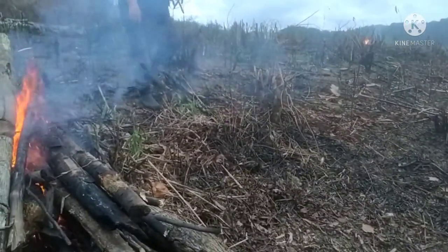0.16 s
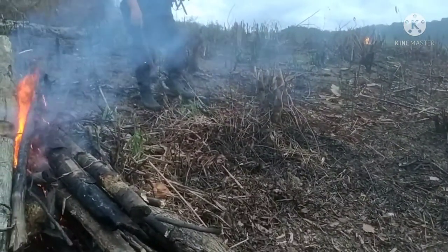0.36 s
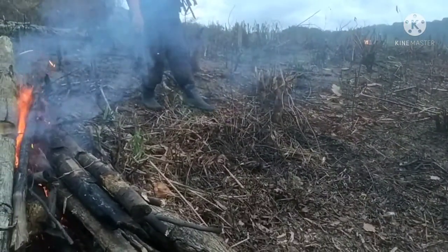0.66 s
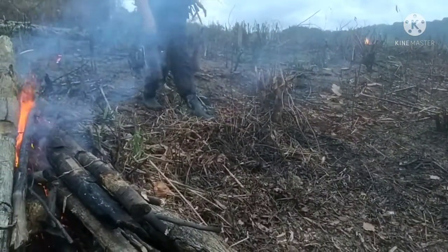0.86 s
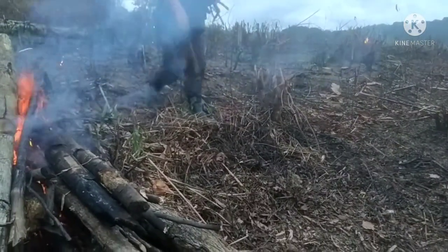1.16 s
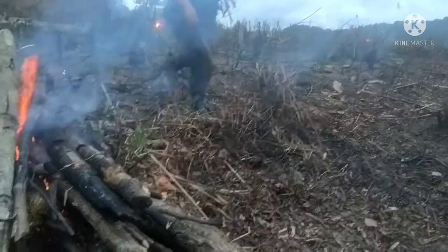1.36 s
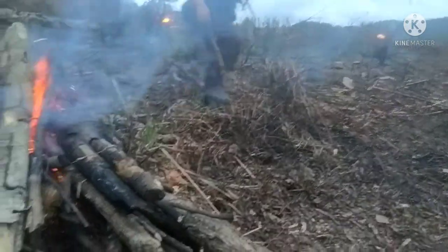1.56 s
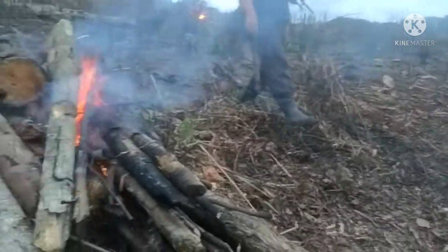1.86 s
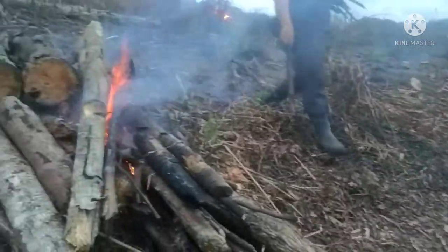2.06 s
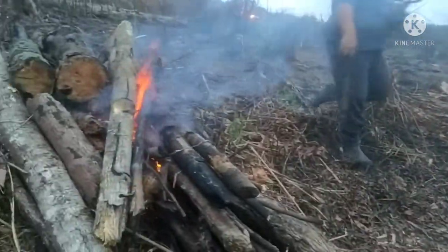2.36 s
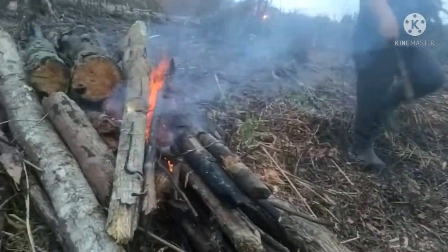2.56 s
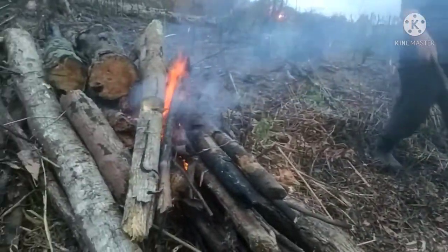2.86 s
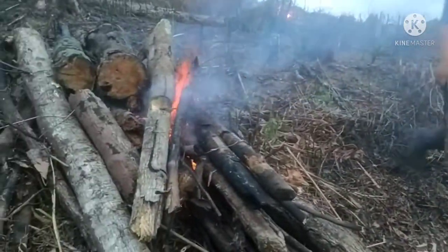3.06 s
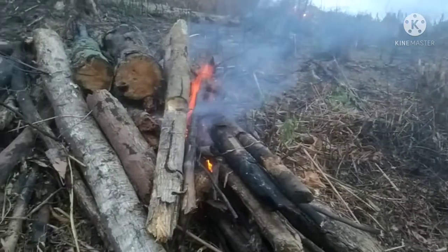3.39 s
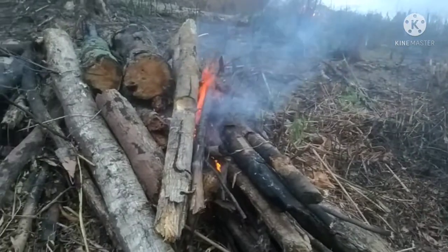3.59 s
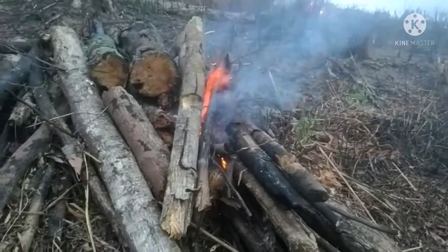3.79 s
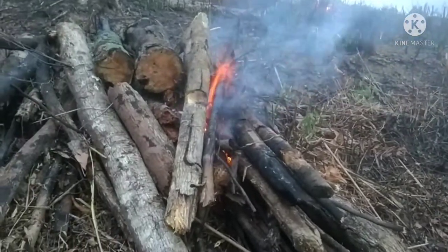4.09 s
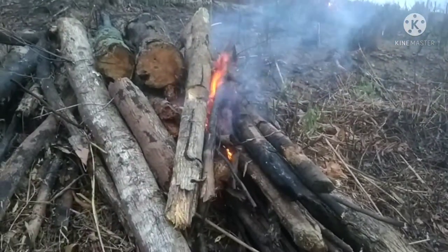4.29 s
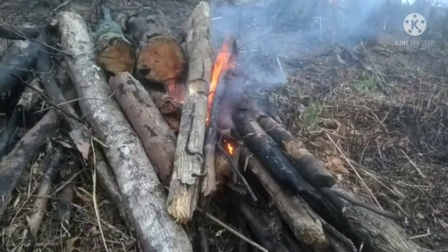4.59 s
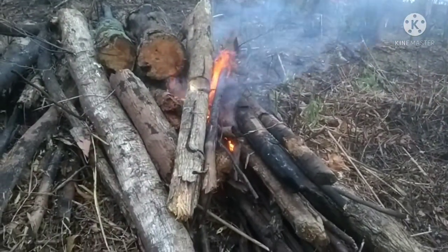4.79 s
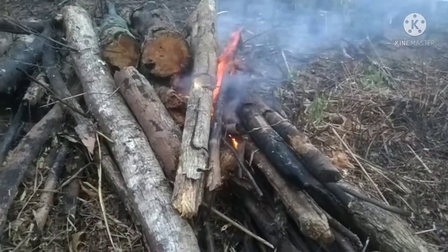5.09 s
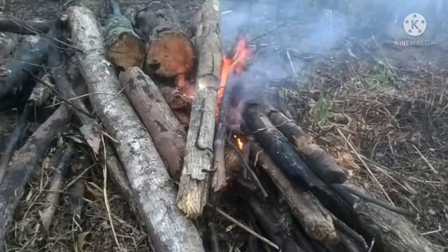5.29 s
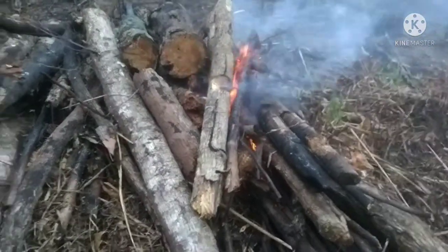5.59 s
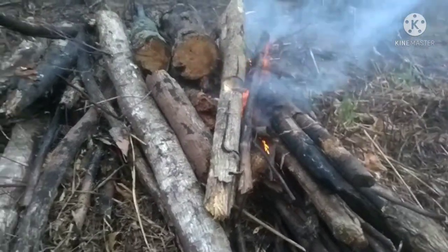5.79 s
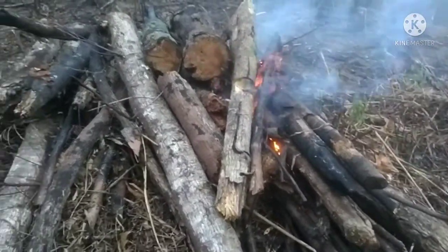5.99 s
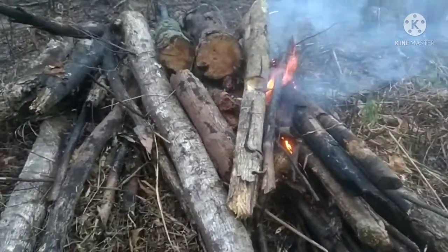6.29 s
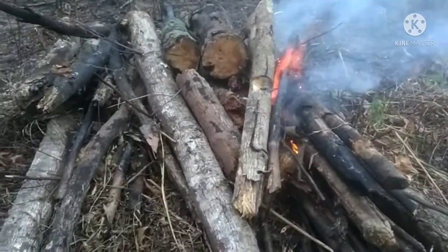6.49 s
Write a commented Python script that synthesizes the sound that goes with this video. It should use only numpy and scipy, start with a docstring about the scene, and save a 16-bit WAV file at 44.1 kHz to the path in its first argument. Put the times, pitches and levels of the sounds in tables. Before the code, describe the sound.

A steady high cicada buzz, with someone walking away over dry stalks and twigs beside a softly popping log fire.

```python
"""Cicadas drone all around a cleared field at evening, each a fast train of tymbal clicks
whose rate sags through a phrase. Close by on the left of the microphone a log fire pops
and lets off short hisses of steam, while someone walks away through dry brush,
crunching stalks and snapping twigs. A faint cricket and thin trills lie far behind."""
import sys
import numpy as np
from scipy import signal
from scipy.fft import rfft, irfft
from scipy.io import wavfile

SR = 44100
rng = np.random.default_rng(int(sys.argv[2]) if len(sys.argv) > 2 else 0)


def dump_mix(stems):
    """Bounce the given channels to the path in sys.argv[1] as a 16-bit WAV at rate SR."""
    frames = np.atleast_2d(stems).T  # one column per channel
    limited = np.clip(frames, -1, 1)  # hard clip at full scale
    pcm = np.round(limited * 32767).astype(np.int16)
    wavfile.write(sys.argv[1], SR, pcm)


N = 293265
T = np.arange(N) / SR
HZ = np.fft.rfftfreq(N, 1 / SR)


def tymbal_phrase(length_s, body_hz, rate_hz, width_hz, skirt_hz, sag, sag_s, jitter,
                  uneven_db=1.78, fade_s=.063):
    """Tymbal clicks ring the hollow abdomen; the muscle starts fast and slows a little."""
    t = T[:int(length_s * SR)]
    rate = rate_hz * (1 + sag * (np.exp(-t / sag_s) - np.exp(-length_s / sag_s)))
    cycles = np.cumsum(rate) / SR
    timing, strength = rng.standard_normal((300, 2))[:int(cycles[-1]) - 1].T
    at = np.interp(np.arange(len(timing)) + .5 + jitter * timing, cycles, np.arange(len(t)))
    size = undb(uneven_db * strength)
    # each click is shared between the two samples around it
    sample, part = at.astype(int), at % 1
    clicks = np.bincount(sample, size * (1 - part), len(t)) + np.bincount(sample + 1, size * part, len(t))
    song = ring(ring(clicks, body_hz, width_hz), body_hz, skirt_hz)
    return unit(song) * np.clip(np.minimum(t, length_s - t) / fade_s, 0, 1)


def near_cicadas(swell_db=1, echo_db=-12):
    """Four singers close by at the field's edge, each phrase swelling to its middle; the trees echo."""
    # Each singer: body resonance in Hz, final click rate in Hz, resonance width in Hz, right lag in seconds.
    voices = {"high": (4260, 74.62, 72, -.00002), "bright": (4106, 74.5, 58, .00009),
              "middle": (3913, 73.8, 70, .00004), "low": (3790, 74.2, 62, 0)}
    # Their phrases. Each row: singer, start and end in seconds, level in dB, left minus right in dB.
    phrases = [("high", -.6, .26, -52, -4), ("high", .25, 1.33, -48.5, -4), ("high", 1.35, 2.05, -51.5, -5),
               ("high", 2.07, 2.88, -48.5, -8), ("high", 2.92, 4.0, -48.5, -8),
               ("high", 4.04, 4.72, -49.5, -4), ("high", 4.76, 5.8, -48.5, -6), ("high", 5.82, 6.9, -51, 2),
               ("bright", -.5, .55, -53.5, 3), ("bright", .6, 1.6, -53.5, 2),
               ("bright", 2.05, 2.85, -52.5, 1), ("bright", 2.9, 3.94, -50.5, 7),
               ("bright", 3.92, 4.85, -49.5, 9), ("bright", 5.03, 5.95, -48, 7),
               ("bright", 6.1, 6.75, -50, 7), ("middle", -.5, 1.38, -53, 6), ("middle", 2.3, 3.4, -55.5, 5),
               ("middle", 3.6, 4.5, -57, 4), ("middle", 4.6, 5.4, -55, 3), ("low", -.6, .3, -53.5, 0),
               ("low", .42, 1.38, -51, -5), ("low", 1.4, 2.48, -52, -5), ("low", 2.5, 3.2, -56.5, -1),
               ("low", 3.3, 4.45, -54, -5), ("low", 4.45, 5.5, -52.5, -4), ("low", 5.62, 6.8, -53, -6)]
    out = np.zeros((2, N))
    for singer, start, end, db, side_db in phrases:
        body_hz, rate_hz, width_hz, lag_s = voices[singer]
        song = tymbal_phrase(end - start, body_hz, rate_hz, width_hz, skirt_hz=560,
                             sag=.0065, sag_s=.45, jitter=.0007, fade_s=.04)
        arch = np.sin(np.linspace(0, np.pi, len(song))) - 2 / np.pi
        add(out, start, place(song * undb(db + swell_db * arch), side_db, lag_s))
    return foliage(out) + undb(echo_db) * scatter(out, t60_s=.25)


def far_cicadas(count=44, wash_db=-3.5, side_db=1.5, db=-46.5):
    """Dozens of distant singers at nearly one click rate, blurred by trees; the furthest are a wash."""
    # Spectrum of the wash. Each row: frequency in Hz, gain in dB.
    wash_colour = [(2400, -50.5), (3000, -66), (3420, -20), (3680, -4.5), (3800, -3), (3950, 1.5),
                   (4150, 0), (4330, -5.5), (4500, -14), (4680, -40), (5200, -13), (5800, -51)]
    singers = np.zeros((2, N))
    for k, (late, pitch, speed, bearing) in enumerate(rng.uniform(-1, 1, (count, 4))):
        song = tymbal_phrase(1.1, 3990 + 150 * pitch, 74.7 + .5 * speed, width_hz=220, skirt_hz=560,
                             sag=.007, sag_s=.35, jitter=.0006)
        start = (k + late / 2) / count * (T[-1] + 1) - 1
        add(singers, start, place(song, side_db=4 * bearing, lag_s=.00008 * bearing))
    wash = colour(rng.standard_normal((2, N)), wash_colour)
    chorus = unit(scatter(singers, t60_s=.24)) + undb(wash_db) * unit(wash)
    return unit(chorus) * undb(db) * pan(side_db)


def footsteps(fall_ratio=1.24, settle_s=.4, settle_db=-15.5, grains_per_s=1300, grain_t60_s=.007):
    """Each footfall breaks a swarm of dry stalks, every one a tiny click; then the stalks settle."""
    # Footfalls. Each row: peak time in seconds, rise in seconds, relative level in dB.
    steps = [(1.14, 0.17, -46), (1.68, 0.11, -50), (2.354, 0.029, -32.5), (2.6, 0.022, -48.5),
             (3.132, 0.03, -40.5), (3.8, 0.095, -50.5), (4.42, 0.12, -48.5), (4.72, 0.24, -53.5),
             (4.949, 0.0095, -43), (5.23, 0.026, -51), (6.315, 0.058, -51.5)]
    # Spectrum of dry brush. Each row: frequency in Hz, gain in dB.
    brush = [(300, -18.5), (700, -8.5), (1300, -1), (1900, -8.5), (2800, -2), (4200, 0), (5600, 3),
             (7000, 8), (9000, 10.5), (11800, 8), (13500, -35)]
    power = np.zeros(N)
    for s, rise, db in steps:
        tread = np.exp(-2 * np.maximum((s - T) / rise, (T - s) / (fall_ratio * rise)))
        settle = np.exp(-2 * np.maximum((s - T) / rise, (T - s) / settle_s))
        power += undb(db) ** 2 * tread + undb(db + settle_db) ** 2 * settle
    breaks = rng.random(N) < grains_per_s / SR
    sizes = undb(3.4 * np.minimum(rng.exponential(size=N), 5))
    decay = np.exp(-2 * np.log(1000) / (grain_t60_s * SR))
    energy = signal.lfilter([1], [1, -decay], breaks * sizes ** 2)
    crunch = diffuse(colour(np.sqrt(energy) * rng.standard_normal((2, N)), brush))
    return unit(crunch) * np.sqrt(power) * undb(1)


def twig_snaps(crack_s=.0018, knock_s=.0056, ring_s=.0024, crack_gain_db=2, echo_db=-22, side_db=-2):
    """Fibres tear underfoot in a millisecond burst; the stick knocks and rings briefly."""
    # Each row: start in seconds, relative crack and knock levels in dB, ring in Hz, ring level in dB.
    twigs = [(1.087, -30, -39, 3030, -54), (1.0987, -20, -36, 3380, -33), (1.0989, -23.5, -35, 9020, -20.5),
             (1.1015, -36, -38, 2960, -47), (1.106, -30, -39, 7800, -38), (1.129, -45, -37.5, 1080, -43),
             (1.168, -31, -38, 2770, -38.5), (1.199, -35, -62, 3000, -64), (1.255, -33, -37, 2730, -61),
             (1.28, -32.5, -62, 3000, -60), (1.354, -34, -41, 1000, -40.5), (1.353, -45, -55, 2710, -37),
             (1.467, -26.5, -36, 2870, -29.5), (1.468, -46, -55, 550, -45.5),
             (1.668, -40, -45.5, 2800, -46), (1.7537, -39, -51, 2900, -53), (1.775, -41, -53, 3230, -43),
             (1.968, -63, -43.5, 2880, -48), (2.137, -39, -67, 10600, -45), (2.3363, -27, -58, 1250, -55),
             (2.3512, -24, -51, 1260, -52), (2.4347, -34, -56, 3000, -63), (2.46, -33, -50, 3000, -60),
             (2.6785, -40, -52, 3000, -55), (3.8413, -39.5, -60, 3000, -62), (3.9, -26.5, -74, 9760, -30.5),
             (4.14, -59, -54, 2640, -48), (6.312, -36.5, -61, 3000, -63)]
    # Spectra of the tearing fibres and the knocking wood. Each row: frequency in Hz, gain in dB.
    fibres = [(600, -21), (2500, -34), (5500, -6), (7500, -0.5), (9300, 5.5), (11800, 4), (15000, -14)]
    wood = [(200, -26), (400, -20.5), (550, -0.5), (800, 0.5), (1400, 0), (2000, 1), (2500, -2),
            (3000, 5.5), (4500, -2), (8000, -2)]
    cracks, knocks, rings = np.zeros((3, 2, N))
    t = T[:2048]
    for s, crack_db, knock_db, hz, ring_db in twigs:
        noise = rng.standard_normal((4, len(t)))
        add(cracks, s, noise[:2] * np.exp(-t / crack_s) * undb(crack_db + crack_gain_db))
        add(knocks, s, noise[2:] * np.exp(-t / knock_s) * undb(knock_db))
        add(rings, s, np.sin(2 * np.pi * hz * t) * np.exp(-t / ring_s) * undb(ring_db))
    out = colour(cracks, fibres) * pan(side_db) + diffuse(colour(knocks, wood)) + rings
    return out + undb(echo_db) * scatter(out, t60_s=.21)


def fire_pops(tick_s=.0019, tick_db=5, side_db=4):
    """Gas pockets burst close on the left: a sharp tick and a soft puff, duller from deep in the pile."""
    # Each row: start in seconds, level in dB, frequency in Hz above which the puff is muffled.
    bursts = [(0.135, -41.5, 800), (0.171, -42.5, 850), (.369, -39, 990), (5.6049, -36, 1000),
              (5.643, -39.5, 1100), (5.656, -39, 1800), (5.6786, -39, 1700), (5.7814, -36.5, 2400)]
    # Spectrum of the pressure pulse. Each row: frequency in Hz, gain in dB.
    thump_colour = [(50, -3), (130, 2.5), (290, 4.5), (600, -3.5), (950, -3.5), (1600, -11.5), (4000, -65)]
    out, t = np.zeros((2, N)), T[:2048]
    thump = colour(signal.unit_impulse(N), thump_colour)[:len(t)]
    for s, db, muffle_hz in bursts:
        puff = signal.sosfilt(signal.butter(2, muffle_hz, fs=SR, output="sos"), thump)
        tick = ring(rng.standard_normal(len(t)) * np.exp(-t / tick_s), hz=13300, width_hz=4400)
        pop = tick / np.abs(tick).max() * undb(tick_db) - puff / np.abs(puff).max()
        add(out, s, pop * undb(db))
    return out * pan(side_db)


def steam(half_length_s=.064, sputter_db=2, gain_db=-1, side_db=2):
    """Sap boils out of the log ends in short, thin hisses."""
    # Each row: middle of the jet in seconds, relative level in dB.
    jets = [(.263, -48), (1.41, -49), (2.284, -50), (3.772, -46), (4.503, -50), (4.72, -49), (5.573, -50.5),
            (6.29, -56)]
    # Spectrum of the hiss. Each row: frequency in Hz, gain in dB.
    hiss_colour = [(5000, -58), (8000, 2), (10000, -1), (11600, 10.5), (13000, 2), (14500, 14),
                   (16000, -14)]
    flow = sum(undb(db) * np.exp(-.5 * ((T - s) / half_length_s) ** 4) for s, db in jets)
    hiss = unit(colour(rng.standard_normal((2, N)), hiss_colour))
    return hiss * flow * undb(sputter_db * wander(51) + gain_db) * pan(side_db)


def thuds(rise_s=.014, width_hz=170, side_db=1):
    """Dull, padded bumps near the centre that swell and die quickly."""
    # Each row: start in seconds, pitch in Hz, relative level in dB.
    bumps = [(2.29, 198, -50), (3.437, 306, -49), (4.644, 250, -49), (5.041, 272, -51.5)]
    out, t = np.zeros((2, N)), T[:8192]
    for s, hz, db in bumps:
        envelope = t / rise_s * np.exp(-t / rise_s)
        add(out, s, noise_band(len(t), hz, width_hz) * envelope * undb(db) * pan(side_db))
    return out


def rasping_cicada(length_s=.38, side_db=4):
    """To the left a second kind of cicada gives short, coarse rasps, its clicks slowing through each."""
    # Each row: start in seconds, level in dB.
    rasps = [(-.2, -56.5), (0.951, -52.5), (2.42, -54.5), (4.231, -54.5), (6.128, -56)]
    out = np.zeros(N)
    for start, db in rasps:
        song = tymbal_phrase(length_s, body_hz=3570, rate_hz=135, width_hz=3300, skirt_hz=770,
                             sag=.08, sag_s=.44, jitter=.005, uneven_db=3, fade_s=.055)
        add(out, start, undb(db) * song)
    return scatter(out, t60_s=.18) * pan(side_db)


def rustle(sets_off_s=.79, onset_s=.088, db=-67, uneven_db=1.6):
    """Once the walker moves, legs keep brushing softly through the stalks."""
    # Spectrum of the swish. Each row: frequency in Hz, gain in dB.
    swish_colour = [(300, 8), (600, -13), (1200, 5), (2200, 10), (4000, 2.5), (9000, -1.5)]
    swish = unit(diffuse(colour(rng.standard_normal((2, N)), swish_colour)))
    moving = np.clip((T - sets_off_s) / onset_s, 0, 1)
    return swish * moving * undb(db + uneven_db * wander(12))


def cricket(first_s=.055, chirp_s=.028, db=-63.2, uneven_db=1.7, fade_db_per_s=.8):
    """A faint cricket chirps on, blurred by distance, quickening once and slowly fading."""
    # Its pace. Each row: time in seconds, chirps per second.
    pace = [(0, 6.1), (4.3, 6.1), (4.6, 6.78)]
    cycles = np.cumsum(np.interp(T, *np.transpose(pace))) / SR
    peaks = first_s + np.interp(np.arange(int(cycles[-1]) + 1), cycles, T)
    sizes = undb(uneven_db * rng.standard_normal(len(peaks)))
    chirps = sum(size * np.exp(-.5 * ((T - s) / chirp_s) ** 2) for s, size in zip(peaks, sizes))
    return noise_band((2, N), hz=2520, width_hz=300) * chirps * undb(db - fade_db_per_s * T)


def far_trills(turn_middle_s=3.5, turn_length_s=.59, waver_db=2):
    """Small insects trill far off; a turn of the microphone brings one forward and loses others."""
    # Each row: pitch and width in Hz, pulses per second, depth 0-1, level in dB before and after the turn.
    insects = [(6470, 210, 8.4, 0.7, -63.5, -65.5), (6950, 360, 54, 0.33, -64, -61),
               (7600, 580, 17, 0.06, -58.5, -92)]
    turn = (1 + np.tanh(2 * (T - turn_middle_s) / turn_length_s)) / 2
    out = np.zeros((2, N))
    for hz, width_hz, rate, depth, before_db, after_db in insects:
        trill = noise_band((2, N), hz, width_hz)
        pulsing = unit(1 + depth * np.sin(2 * np.pi * rate * T))
        db = before_db + (after_db - before_db) * turn
        out += trill * pulsing * undb(db + waver_db * wander(8))
    return out


def flames_and_air(flame_hz=600, flutter_db=1, waver_db=1.2, db=-55.5):
    """Flames flutter softly in the bass under the fine hiss of distant insects."""
    # Spectrum of still air, flames and insects. Each row: frequency in Hz, gain in dB.
    air_colour = [(25, -5), (60, 6), (120, 7), (280, 4), (550, -4.5), (1250, -8.5), (1600, -14.5),
                  (2600, -5), (4800, 1.5), (5800, -5), (6700, -0.5), (8500, 3.5), (11800, -2), (13000, -27),
                  (15000, -6)]
    bed = rfft(diffuse(rng.standard_normal((2, N)))) * undb(along(air_colour))
    bass = 1 / (1 + (HZ / flame_hz) ** 4)
    flames = irfft(bed * bass, N) * undb(flutter_db * wander(22))
    hiss = irfft(bed * (1 - bass), N) * undb(waver_db * wander(3.5))
    return unit(flames + hiss) * undb(db)


def foliage(x, spread_s=.02, grain_hz=60):
    """Leaves delay each partial differently: the clicks blur, the tones stay clear."""
    delay = spread_s * np.interp(HZ / grain_hz, np.arange(600), rng.random(600))
    return irfft(rfft(x) * np.exp(-2j * np.pi * np.cumsum(delay) * HZ[1]), N)


def scatter(x, t60_s):
    """Diffuse echoes from trees and ground, different on each side."""
    t = T[:SR // 2]
    tail = rng.standard_normal((2, len(t))) * np.exp(-np.log(1000) * t / t60_s)
    tail /= np.sqrt(np.sum(tail ** 2, axis=1, keepdims=True))
    return signal.fftconvolve(np.atleast_2d(x), tail, axes=1)[:, :N]


def diffuse(pair):
    """Blend two unrelated channels so that long waves reach both sides more alike."""
    # Each row: frequency in Hz, likeness of left and right from 0 to 1.
    likeness = [(100, .62), (450, .44), (1200, .5), (1600, .15), (6000, .08), (11000, .03)]
    angle = np.arcsin(along(likeness)) / 2
    both = rfft(pair)
    return irfft(both * np.cos(angle) + both[::-1] * np.sin(angle), N)


def place(song, side_db, lag_s):
    """A singer's bearing makes one side louder and shifts the right channel in time."""
    return np.array([song, np.roll(song, int(round(lag_s * SR)))]) * pan(side_db)


def pan(db):
    """Left and right gains for a level difference, left minus right."""
    return undb(np.array([[.5], [-.5]]) * db)


def undb(db):
    """Decibels to gain."""
    return 10 ** (np.asarray(db) / 20)


def unit(x):
    """Scale to rms 1."""
    return x / np.sqrt(np.mean(x ** 2) + 1e-30)


def along(points):
    """A (Hz, value) table spread over a log-frequency axis."""
    hz, value = np.transpose(points)
    return np.interp(np.log(HZ + 1), np.log(hz), value)


def colour(x, points):
    """Causal filter with the given (Hz, dB) shape."""
    cepstrum = irfft(np.log(undb(along(points))), N)
    cepstrum[1:N // 2] *= 2
    cepstrum[N // 2:] = 0
    return irfft(rfft(x) * np.exp(rfft(cepstrum)), N)


def ring(x, hz, width_hz):
    """One resonance, gain 1 at its centre."""
    return signal.lfilter(*signal.iirpeak(hz, hz / width_hz, fs=SR), x)


def noise_band(shape, hz, width_hz):
    """Noise rung twice at one pitch, rms 1."""
    return unit(ring(ring(rng.standard_normal(shape), hz, width_hz), hz, 2 * width_hz))


def wander(knots_per_s):
    """Smooth random drift with a spread of 1."""
    knots = rng.standard_normal(1000)
    return unit(np.interp(T * knots_per_s, np.arange(len(knots)), knots))


def add(out, s, sound):
    """Mix a sound in at a time, dropping what falls outside."""
    start = int(s * SR)
    a, b = max(start, 0), min(start + sound.shape[-1], N)
    if b > a:
        out[..., a:b] += sound[..., a - start:b - start]


def scene():
    """Insects, walker and fire as they reach the microphone."""
    insects = near_cicadas() + far_cicadas() + rasping_cicada() + cricket() + far_trills()
    walker = footsteps() + rustle() + twig_snaps()
    return insects + walker + thuds() + steam() + fire_pops() + flames_and_air()


def record(dry, shelf_hz=12050, shelf_db=-23, top_hz=15600):
    """The phone's microphone ports colour each side; its treble steps down sharply, then is cut off."""
    # The right port loses the top. Each row: frequency in Hz, left minus right in dB.
    ports = [(30, 1), (250, 3), (1000, 1), (2500, 4), (4200, 4), (5500, 0), (8800, 1), (10000, 7),
             (11500, 14)]
    heard = irfft(rfft(dry) * pan(along(ports)), N)
    body = signal.sosfilt(signal.ellip(10, .2, 60, shelf_hz, fs=SR, output="sos"), heard)
    stepped = body + undb(shelf_db) * heard
    return signal.sosfilt(signal.ellip(10, .2, 70, top_hz, fs=SR, output="sos"), stepped)


dry = scene()
out = record(dry)
dump_mix(out)
```